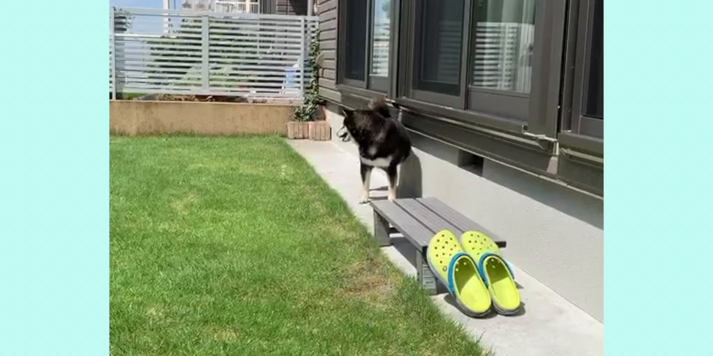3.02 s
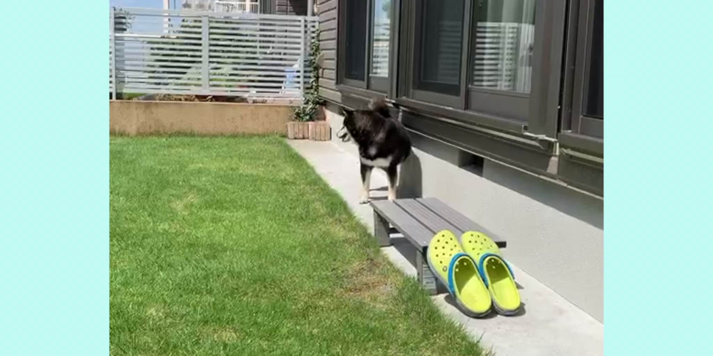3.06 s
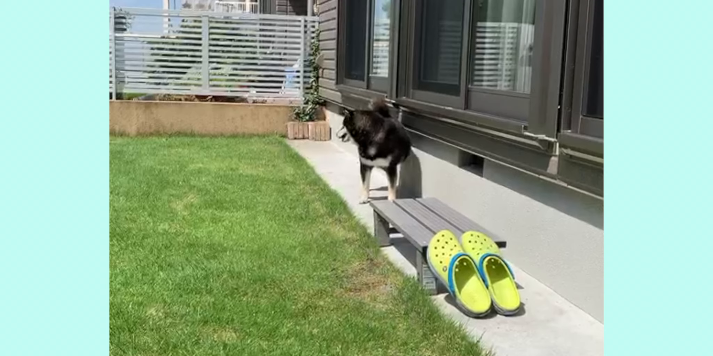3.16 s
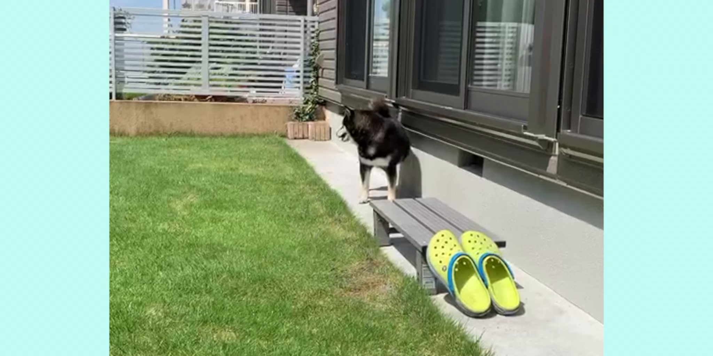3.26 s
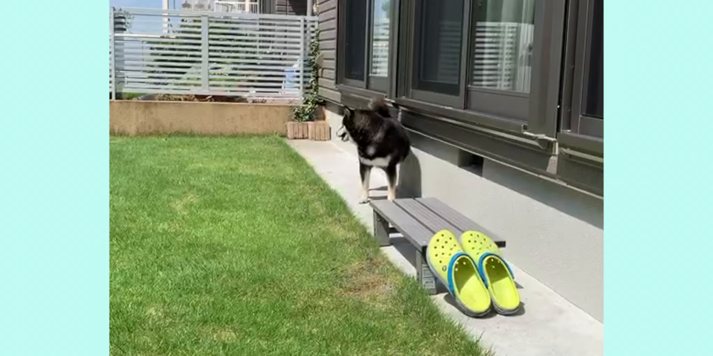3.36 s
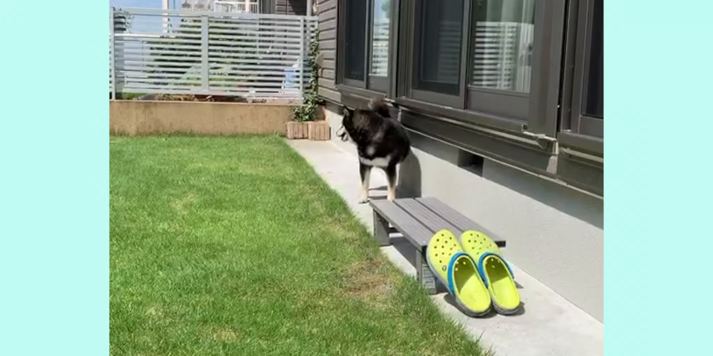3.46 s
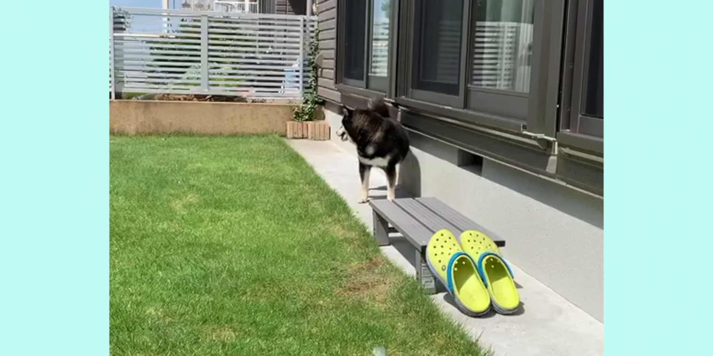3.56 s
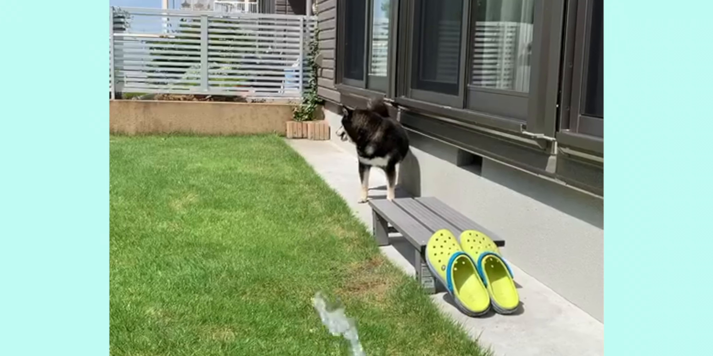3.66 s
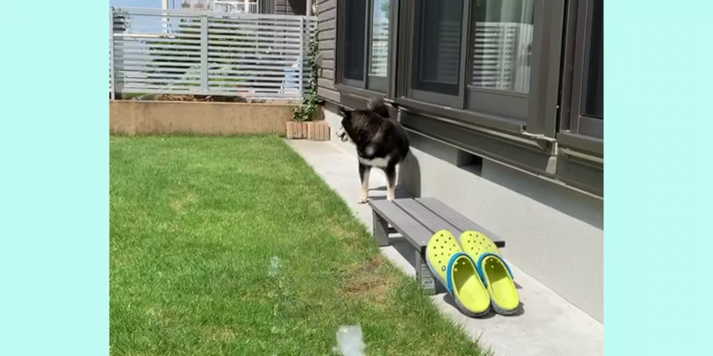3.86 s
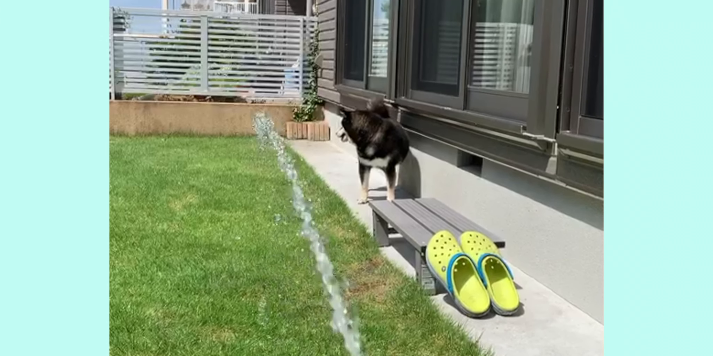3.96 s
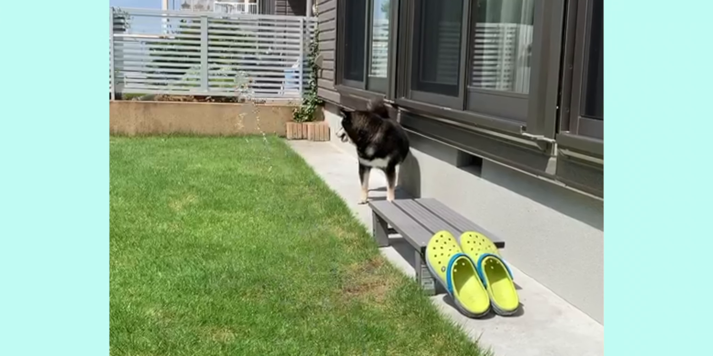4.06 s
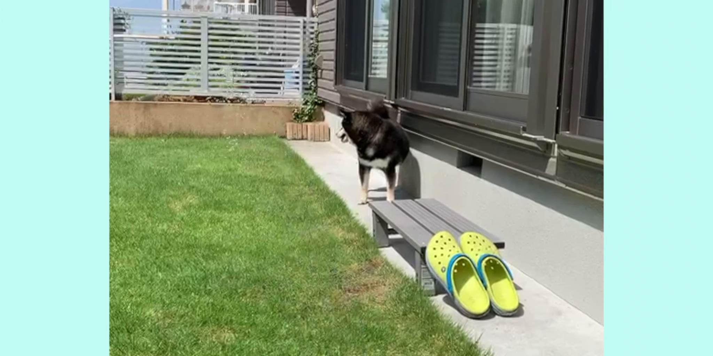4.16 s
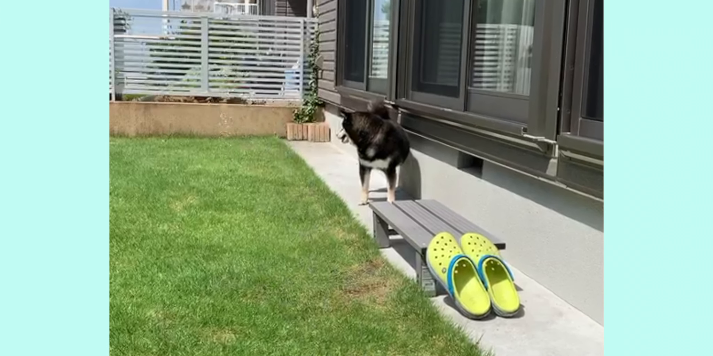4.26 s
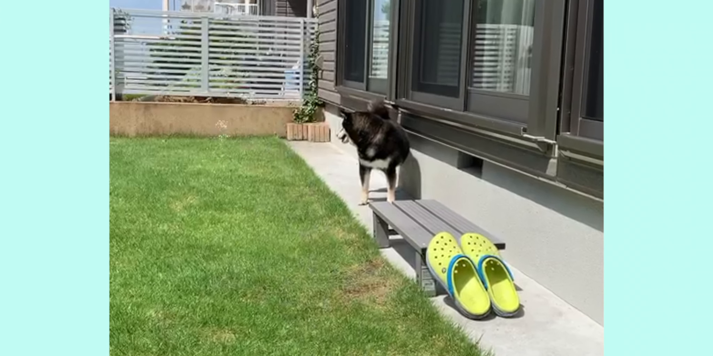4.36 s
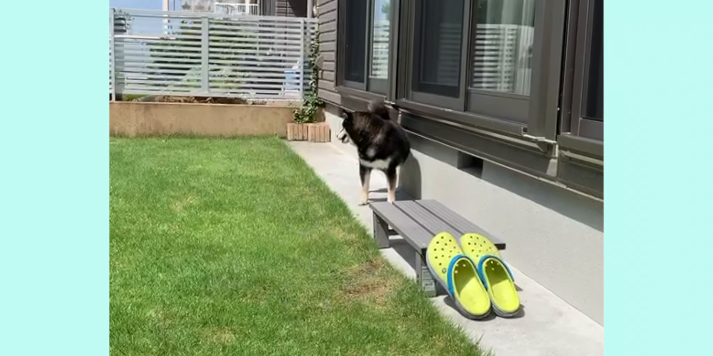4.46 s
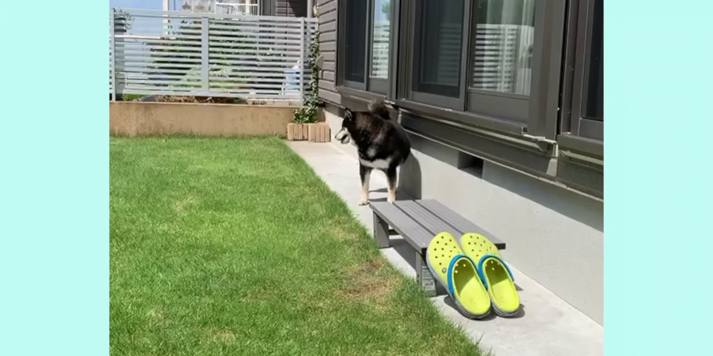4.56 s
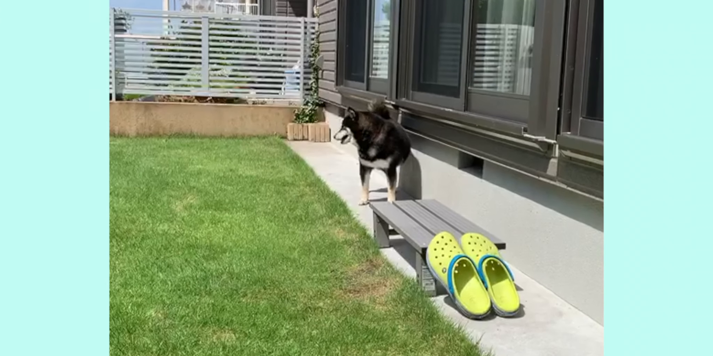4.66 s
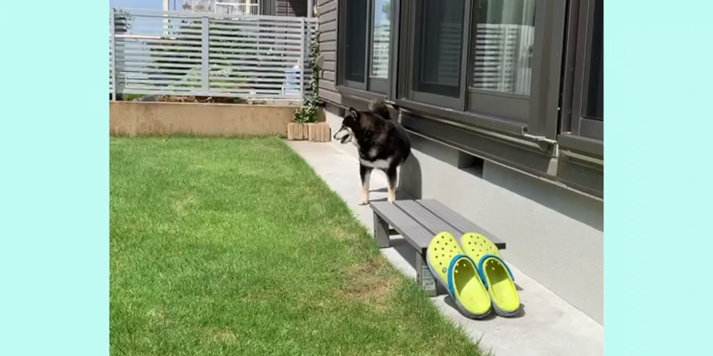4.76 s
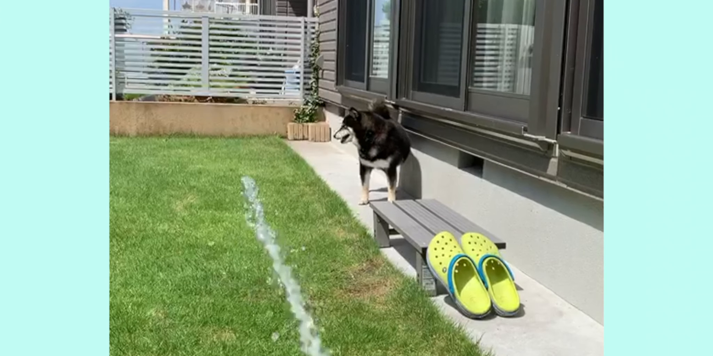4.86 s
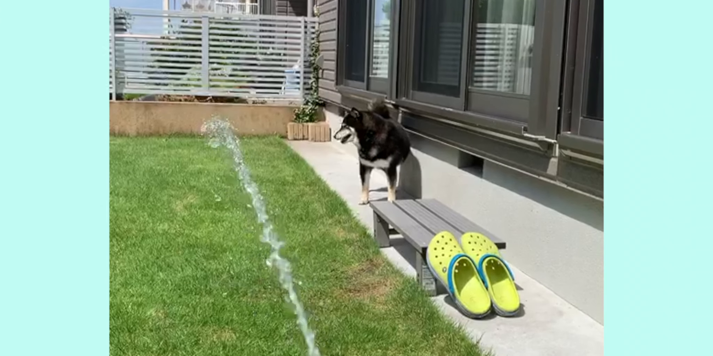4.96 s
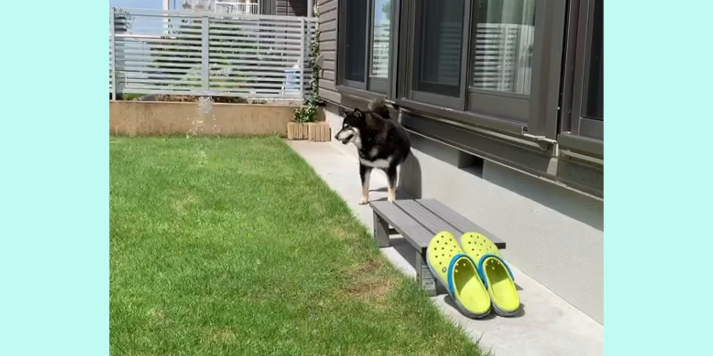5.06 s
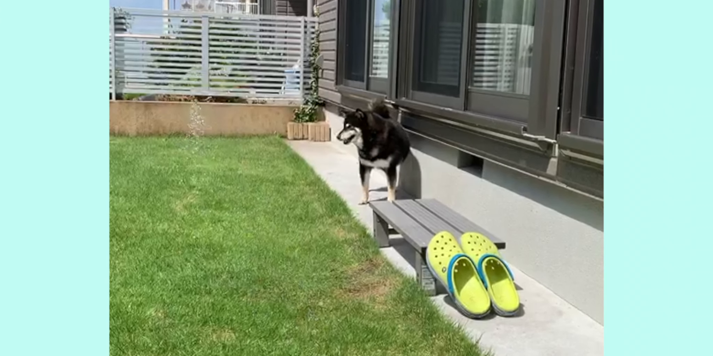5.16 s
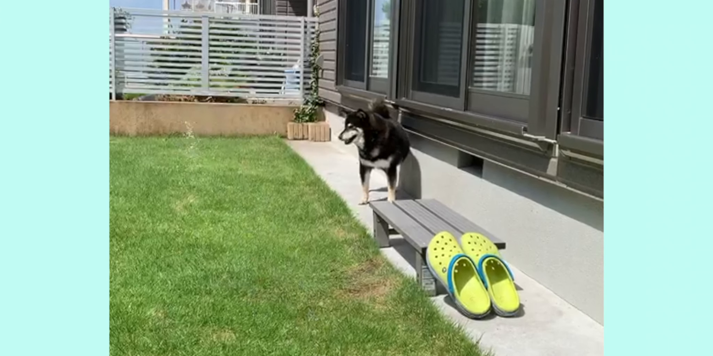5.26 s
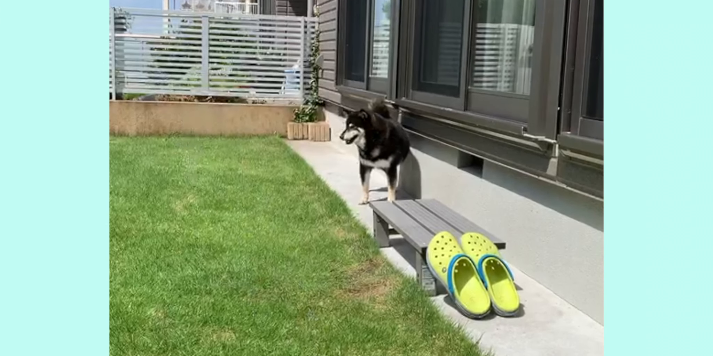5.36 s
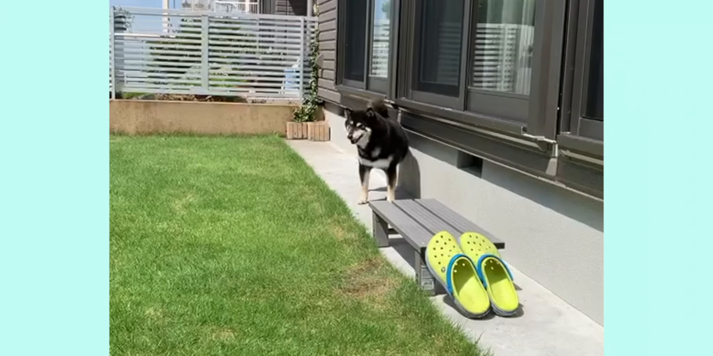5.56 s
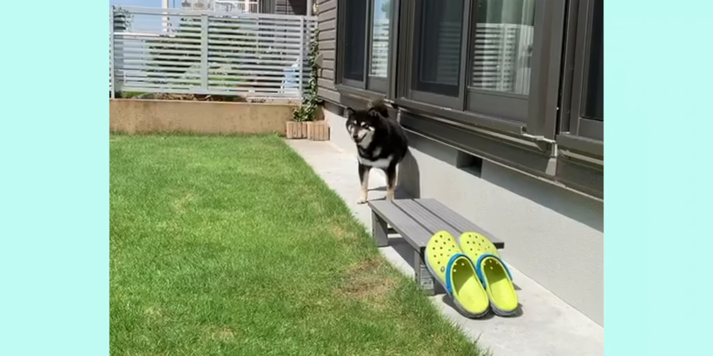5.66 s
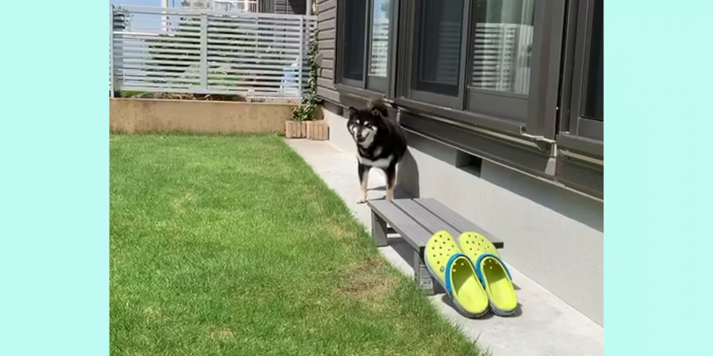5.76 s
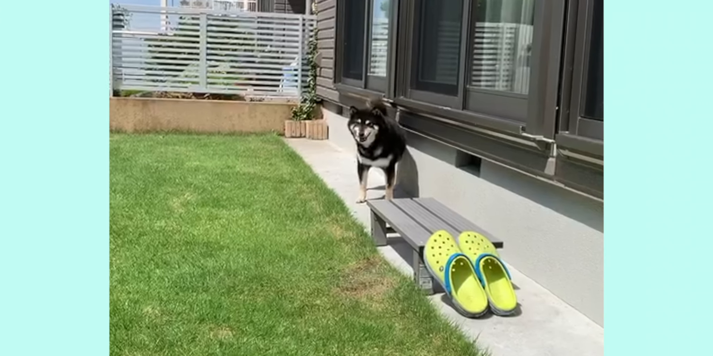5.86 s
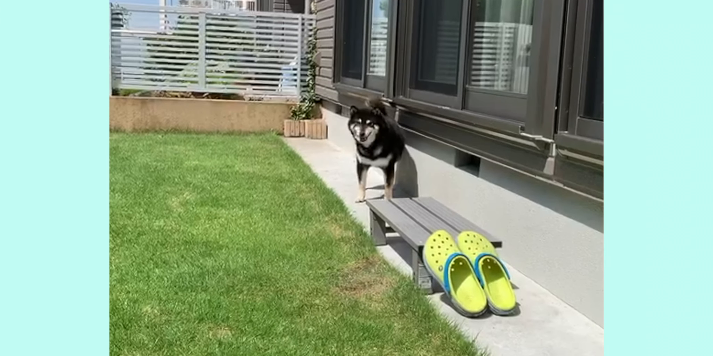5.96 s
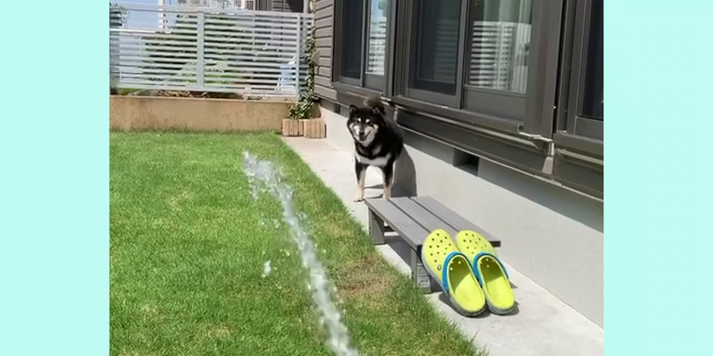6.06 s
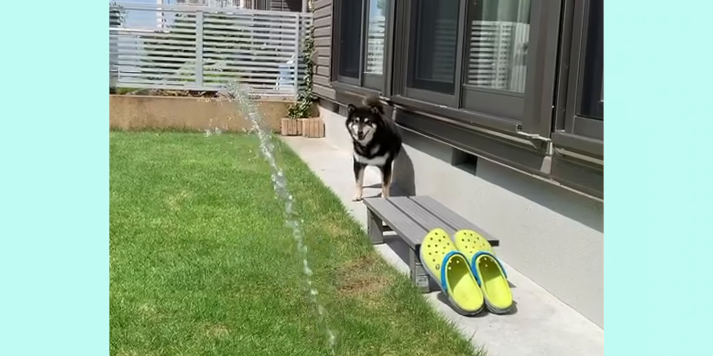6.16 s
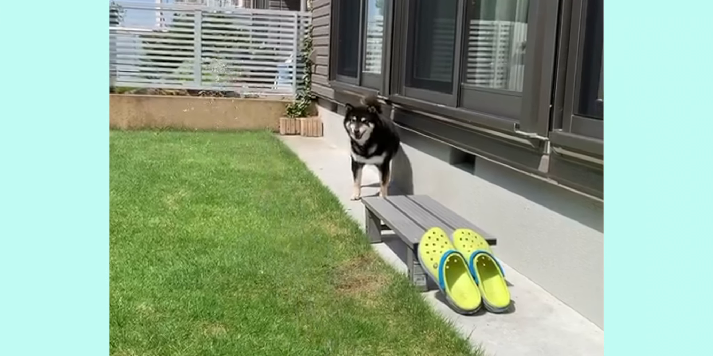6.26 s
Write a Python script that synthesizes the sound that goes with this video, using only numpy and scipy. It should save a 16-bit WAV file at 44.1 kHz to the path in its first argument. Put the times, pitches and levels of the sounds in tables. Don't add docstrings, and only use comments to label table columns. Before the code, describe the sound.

A hand squeezes a spray nozzle in brief bursts: clicks, spitting air, hiss, hard clack, then light water patter on grass amid buzzing cicadas.

```python
import sys
import numpy as np
from scipy import signal
from scipy.fft import rfft, irfft, next_fast_len
from scipy.io import wavfile
from scipy.ndimage import uniform_filter1d

SR = 44100
rng = np.random.default_rng(int(sys.argv[2]) if len(sys.argv) > 2 else 0)


def ratio(d):
    e = np.asarray(d, float) / 20
    return 10 ** e


def to_wav(sig):
    pcm = np.clip(np.atleast_2d(sig), -1, 1) * 32767
    pcm = np.round(pcm).astype(np.int16)
    wavfile.write(sys.argv[1], SR, pcm.T)


N = 278271


def evened(x):
    return x / np.sqrt(np.mean(x ** 2) + 1e-20)


def read(points, hz):
    f, value = np.transpose(points)
    return np.interp(np.log(hz + 1), np.log(f + 1), value)


def add(mix, s, sound):
    part = mix[..., round(s * SR):][..., :sound.shape[-1]]
    part += sound[..., :part.shape[-1]]


def coloured(x, spectrum, lo_hz, hi_hz):
    size = next_fast_len(N)
    hz = np.fft.rfftfreq(size, 1 / SR)
    z = rfft(x, size) * ratio(read(spectrum, hz))
    in_band = (hz > lo_hz) & (hz < hi_hz)
    band_rms = np.sqrt(2 * np.mean((abs(z[:, in_band]) ** 2).sum(1)) / size / N)
    return irfft(z, size)[:, :N] / band_rms


def resonate(x, hz, width_hz):
    turn = np.exp(2j * np.pi * np.cumsum(hz * np.ones(x.shape[-1])) / SR)
    r = np.exp(-np.pi * width_hz / SR)
    return 2 * (turn * signal.lfilter([1 - r], [1, -r], x / turn)).real


def slow(count, per_s):
    knots = rng.standard_normal((count, int(N / SR * 400) + 4))
    position = np.arange(N) / SR * per_s
    return np.array([np.interp(position, np.arange(len(k)), k) for k in knots])


def droplets(spread_db, per_s):
    size = ratio(spread_db * np.minimum(rng.exponential(1, (2, N)), 4))
    size = size * (rng.random((2, N)) < per_s / SR)
    drops = signal.oaconvolve(size, np.hanning(30)[None], "same", axes=1)
    return rng.standard_normal((2, N)) * np.sqrt(1 + (0.32 * evened(drops)) ** 2)


def patchy(patchy_db, size):
    frames = N // (size // 4) + 5
    a, b, c, d, patches = rng.standard_normal((frames, size // 2 + 1, 5)).T
    patches = evened(uniform_filter1d(uniform_filter1d(patches, 7, 0), 12, 1))
    z = np.array([a + 1j * b, c + 1j * d]) * ratio(patchy_db * patches)
    return signal.istft(z, nperseg=size, noverlap=size * 3 // 4)[1][:, :N]


def smooth(power):
    return np.interp(np.arange(N) / SR, np.arange(len(power)) / 1000, power)


def held(before_s, t60_s, db):
    t, power = np.arange(0, N / SR, .001), 0
    for opens, shut, flow_db, *_ in SQUIRTS:
        rise_db = -26.0 * np.maximum(opens - t, 0) / before_s
        fall_db = -60 * np.maximum(t - shut, 0) / t60_s
        power = power + ratio(flow_db + db + rise_db + fall_db) ** 2
    return smooth(power)


def landed(rows):
    t = np.arange(0, N / SR, .001)
    return smooth(sum(ratio(db) ** 2 * np.exp(-((t - s) / spread) ** 2) for s, db, spread in rows))


# [Hz, dB]
RUMBLE = [(20, -11), (32, -12), (55, 4.5), (80, 1), (130, -4), (250, -9.5), (450, -17), (700, -16.5),
          (1200, -39), (1800, -51.5)]


def town():
    level_db = -56
    return ratio(level_db) * coloured(patchy(3.1, size=2048), RUMBLE[:7] + [(800, -69.5)], 18, 500)


# f/Hz, density/dB
WASH_COLOUR = [(250, -8), (500, 4), (1000, 5.5), (1800, -3.5), (2600, -9)]
# t/s, level/dB, spread/s
RUSTLES = [
    (.33, -57, 0.039),
    (.47, -60, 0.056),
    (.85, -66, 0.042),
    (1.9, -64, .08),
    (3.6, -70, 0.22),
    (4.3, -59.5, 0.021),
    (5.28, -61.5, 0.051),
]


def wash():
    floor_db, landing_db = -76.5, -17
    stirred = held(before_s=0.11, t60_s=0.55, db=-5.5)
    power = ratio(floor_db) ** 2 + stirred + ratio(landing_db) ** 2 * landed(LANDINGS) + landed(RUSTLES)
    return np.sqrt(power) * coloured(patchy(3.7, size=512), WASH_COLOUR, 340, 1800)


# t/s, level/dB
CHORUS = [(0.0, -47.5), (0.33, -49.5), (0.83, -48), (2.41, -48.5), (3.78, -49.5), (5.18, -50),
          (5.97, -50.5), (6.31, -49.5)]
# f/Hz, density/dB
CICADAS = [(1500, -25.1), (2000, -16.9), (2500, -6.4), (3200, 0.0), (3800, -1.2), (4600, -2.5),
           (5500, -2.3), (6600, -3.2), (7600, -6.4), (9000, -7.6), (10000, -12.6), (11000, -22.7),
           (13500, -30.1), (15500, -60.9)]
# f/Hz, rms level/dB
SINGERS = [(3332, -67.5), (3779, -66.5), (4640, -101), (5071, -96), (5572, -66.5), (6072, -71),
           (6406, -71.5), (6654, -69.5), (7020, -72.5)]


def cicadas():
    chorus = coloured(patchy(2.28, size=512), CICADAS, 5360, 7110)
    waver, swell = slow(count=len(SINGERS), per_s=5.6), slow(count=len(SINGERS), per_s=22)
    buzz = slow(count=1, per_s=110)
    noise, near = rng.standard_normal((2, N)), 0
    for (hz, db), w, up in zip(SINGERS, waver, swell):
        song = evened(resonate(noise, hz * (1 + 0.00815 * w), width_hz=15))
        near = near + ratio(db + 4.96 * up) * song
    level_db = np.interp(np.arange(N) / SR, *np.transpose(CHORUS))
    return ratio(level_db - 1.54 + 1.1 * buzz) * chorus + ratio(level_db - level_db.mean() + 7.5) * near


# f/Hz, density/dB
LAWN = [(300, -48), (1200, -45), (3500, -2), (7000, -1), (11000, -6), (16000, -4.5)]
# t/s, level/dB, spread/s
LANDINGS = [(.48, -60, .03), (.6, -52.5, 0.049), (1.82, -62, 0.084), (2.77, -63, 0.067),
            (2.91, -52.5, 0.029), (3.02, -58, 0.063), (3.98, -51, 0.017), (4.27, -66, 0.084),
            (4.44, -63.5, .03), (5.2, -59, 0.018), (5.38, -55.5, 0.032)]


def patter():
    drizzle_db = -76.5
    leak = held(before_s=0.04, t60_s=.01, db=-9)
    drip = held(before_s=.001, t60_s=0.067, db=8.5)
    power = ratio(drizzle_db) ** 2 + landed(LANDINGS) + leak + drip
    drops = coloured(droplets(spread_db=5.5, per_s=1500), LAWN, 10500, 18000)
    return ratio(-3.0 + 2.5 * slow(count=1, per_s=40)) * np.sqrt(power) * drops


# t/s, peak level/dB, f/Hz
TICKS = [(5.283, -40, 1470), (0.06, -32, 720), (0.125, -30, 1500), (0.293, -28, 1690), (1.283, -32.5, 860),
         (1.353, -27, 1640), (1.503, -31.5, 1660), (1.776, -32.5, 1590), (1.785, -40, 1770),
         (2.403, -25, 1650), (2.57, -32, 1530), (3.406, -44, 770), (3.542, -69, 1450), (3.632, -30, 720),
         (3.71, -25.5, 1640), (3.724, -36, 1660), (3.834, -30, 1200), (3.974, -33, 1150),
         (4.005, -38, 1080), (4.266, -32.5, 1690), (4.76, -25, 1710), (5.13, -40, 1130),
         (5.207, -37.5, 1020), (5.267, -35, 1730), (5.914, -59, 950), (5.936, -54, 1260),
         (5.983, -28, 1760), (6.108, -24.5, 1150), (6.125, -29, 1170), (6.234, -34, 1440)]


def ticks():
    out, t = np.zeros(N), np.arange(2000) / SR
    t60_s, rise_s = 0.02, 0.00082
    modes = [(1, 1.0), (0.97, 0.25), (0.86, 0.66), (0.75, 0.61)]
    for s, db, hz in TICKS:
        ring = sum(share * np.sin(2 * np.pi * k * hz * t) for k, share in modes)
        ring = ring * ratio(-60 * t / t60_s) * (1 - np.exp(-t / rise_s))
        add(out, s - .0006, ratio(db - 6.0) * ring / abs(ring).max())
    return out


# t/s, peak level/dB
SPRING = [(0.0343, -41), (0.058, -32), (0.1865, -41), (1.2855, -32), (1.3074, -40), (1.4212, -31),
          (2.5223, -17), (3.4415, -26), (3.4984, -25), (3.6214, -55), (3.6282, -30), (3.8487, -38),
          (4.6907, -41), (4.723, -25), (5.911, -29), (6.208, -33), (6.2317, -37.5)]


def spring():
    out, t = np.zeros(N), np.arange(-200, 400) / SR
    for s, db in SPRING:
        noise = rng.standard_normal(600)
        click = np.diff(noise, 2, prepend=[0, 0]) * np.exp(-abs(t - .0008) / 0.00078)
        add(out, s + t[0], ratio(db) * click / abs(click).max())
    return out


# t/s, peak level/dB, crack level/dB, touch lead/s, grip pitch ratio
KNOCKS = [
    (0.1999, -18, -16, 0.00114, 0.795),
    (1.4514, -12.5, -10, 0.0019, 1),
    (2.5291, -13, -8, 0.00228, 1.003),
    (3.9228, -14, -12, 0.0017, 1.05),
    (4.9051, -14, -12.5, 0.00226, 0.996),
    (6.0884, -9, -5, .0038, 1.02),
]
# f/Hz, level/dB, t60/s
BODY = [(430, -11.5, 0.031), (785, -0.5, 0.03), (943, -2, 0.026), (999.5, 6, 0.019), (1134, -7.5, 0.026),
        (1425, -1, .018), (1973, -7, 0.018), (2680, -8, 0.03), (3370, -4, 0.03)]


def knocks():
    out, t = np.zeros(N), np.arange(3000) / SR
    touch_db, blow_s = -12, 0.00063
    bright_db_per_oct, bright_per_crack = 1.5, 0.27
    hz, mode_db, t60_s = np.transpose(BODY)[..., None]
    t60_s = np.minimum(t60_s, 22 / hz)
    for s, db, crack_db, lead_s, pitch in KNOCKS:
        noise = rng.standard_normal(3000)
        grip = pitch + .02 * noise[:len(BODY), None]
        tilt_db = bright_db_per_oct + bright_per_crack * (crack_db - db)
        level = ratio(mode_db + tilt_db * np.log2(hz / 900) - 60 * t / t60_s)
        sign = np.sign(hz - 600)
        ring = (level * np.sin(2 * np.pi * hz * grip * t) * sign).sum(0)
        ring = ring * (1 - np.exp(-t / blow_s)) ** 2
        both = ratio(touch_db) * ring
        add(both, max(lead_s, 0), ring)
        add(out, s - lead_s, ratio(db) * both / abs(both).max())
        crack = signal.lfilter([1, -.3], [1], noise) * t * np.exp(-t / .0013)
        add(out, s - .0003, ratio(crack_db) * crack / abs(crack).max())
    return out


# t/s, peak level/dB, f/Hz
SPITS = [(0.0786, -19, 5940), (0.1282, -25, 4330), (0.1723, -34, 3960), (0.1903, -36, 8600),
         (1.316, -20.5, 5430), (1.3449, -34, 4820), (1.3511, -29, 4820), (1.31, -28, 3400),
         (1.4326, -35, 4900), (2.3648, -25, 5560), (2.3724, -24, 5700), (2.374, -19, 5800),
         (2.513, -42, 4240), (3.434, -34, 6130), (3.5462, -30, 4170), (3.5947, -33, 3450),
         (3.7835, -26, 8060), (3.7929, -18, 5300), (3.8097, -27.5, 5340), (3.8132, -26, 5000),
         (3.862, -34, 5600), (3.8682, -30, 5360), (3.911, -30, 10850), (4.7302, -19, 6160),
         (4.7874, -27.5, 5300), (4.8037, -48, 5450), (5.9355, -22, 5760), (5.9398, -20.5, 4650),
         (5.9874, -35, 4870), (6.2395, -17, 6000)]


def spits():
    out, t = np.zeros(N), np.arange(-200, 400) / SR
    treble_db, rise_s, shortest_s, longest_ratio = -8.5, 0.00035, 0.0014, 2.4
    for s, db, hz in SPITS:
        noise = rng.standard_normal(600)
        length_s = shortest_s * longest_ratio ** min(abs(noise[0]), 1)
        puff = evened(resonate(noise, hz, width_hz=1470))
        puff = puff + ratio(treble_db) * np.diff(noise, prepend=0)
        puff = abs(signal.hilbert(puff)) ** -.3 * puff
        puff = puff * np.exp(-np.maximum(t / length_s, -t / rise_s))
        add(out, s + t[0], ratio(db + 3) * puff / abs(puff).max())
    return out


# open t/s, shut t/s, flow level/dB, whistle level over flow/dB, throat f/Hz
SQUIRTS = [
    (0.042, 0.198, -54, -8, 5400),
    (1.295, 1.451, -52, 8.5, 4950),
    (2.356, 2.525, -53.5, 10.5, 5100),
    (3.44, 3.639, -69, 19.5, 3900),
    (3.781, 3.926, -53, 10.5, 5730),
    (4.716, 4.913, -52, 4.5, 5500),
    (5.926, 6.093, -50.5, 11.5, 5500),
    (6.226, 6.344, -52, 5, 5750),
]
# f/Hz, density/dB
JET = [(150, -6), (400, 0), (800, 2), (1500, -1), (2200, -3), (3200, -2), (6500, 2), (8000, -2), (10000, 1),
       (12500, 1), (15300, 0), (17000, -3)]


def squirts():
    open_s, close_s = 0.024, 0.0019
    gush_db, gush_s = 31, 0.0072
    surge_db, surge_s = 8, .013
    sag_per_s, throat_width_hz, flutter_db = 1, 1700, 3.2
    hiss = coloured(droplets(spread_db=2.5, per_s=1200), JET, 10300, 12200)
    flutter, sputter, out = slow(count=3, per_s=280), slow(count=2, per_s=35), np.zeros((2, N))
    for opens, shut, flow_db, whistle_db, hz in SQUIRTS:
        at = np.arange(round(opens * SR), min(round(shut * SR), N))
        since, until = at / SR - opens, shut - at / SR
        throat_hz = hz * (1 - sag_per_s * since) * (1 + 0.013 * flutter[0, at])
        whistle = resonate(hiss[:, at], throat_hz, throat_width_hz)
        whistle = evened(resonate(whistle, throat_hz, throat_width_hz))
        surge = surge_db * np.exp(-until / surge_s)
        whistle *= ratio(whistle_db + flutter_db * flutter[1, at] + 3.6 * sputter[0, at] - 2 * surge)
        gush = gush_db * np.exp(-since / gush_s)
        flow = ratio(flow_db + gush + surge + 0.5 * sputter[1, at])
        flow *= np.minimum(since / open_s, 1) * np.minimum(until / close_s, 1)
        out[:, at] += flow * (ratio(3.7 * flutter[2, at]) * hiss[:, at] + whistle)
    return out


def echoed(x, wet_db=-17, t60_s=0.059, yard_db=-25, yard_t60_s=0.32):
    t = np.arange(12000) / SR
    decay = ratio(-60 * t / np.array([[t60_s], [yard_t60_s], [.004]]))
    wall, yard, twin = rng.standard_normal((3, 12000)) * decay
    wall, yard = uniform_filter1d(wall, size=3), uniform_filter1d(yard, size=4)
    tail = ratio(wet_db) * wall / np.linalg.norm(wall) + ratio(yard_db) * yard / np.linalg.norm(yard)
    direct = np.array([x, signal.oaconvolve(x, twin / np.linalg.norm(twin))[:N]])
    return direct + signal.oaconvolve(direct, (tail * (t > .002))[None], axes=1)[:, :N]


# f/Hz, lead/rad
LEAD = [(60, 0), (125, -.2), (500, -.8), (1300, -1.2), (2000, 0), (2700, -.5), (3250, 1.8), (4000, 2.3)]


def ports(pair, same):
    opposed_hz, full_turn_hz = 4700, 4300
    size = next_fast_len(N)
    hz = np.fft.rfftfreq(size, 1 / SR)
    lead = read(LEAD + [(opposed_hz, np.pi)], hz)
    lead = lead + 2 * np.pi * np.maximum(hz - opposed_hz, 0) / full_turn_hz
    c, (a, b) = np.clip(read(same, hz), 0, 1), rfft(pair, size)
    left = ratio(-0.03) * a * np.exp(.5j * lead)
    right = (c * a + np.sqrt(1 - c ** 2) * b) * np.exp(-.5j * lead)
    return irfft(np.array([left, right]), size)[:, :N]


# f/Hz, share
NEAR_SAME = [(100, 1), (1900, 0.94), (2400, 0.48), (3000, 0.04), (3500, 0.53), (4300, 0.9), (16000, 0.98)]
# f/Hz, share
FAR_SAME = [(30, 0.93), (200, 1), (600, 0.1), (1300, 0.4), (1900, 0.65)]


def scene():
    near = squirts() + echoed(spits() + spring() + knocks() + ticks()) + patter() + cicadas()
    return ports(near, NEAR_SAME) + ports(town() + wash(), FAR_SAME)


def low_pass(x):
    return signal.sosfilt(signal.butter(12, 16440, fs=SR, output="sos"), x)


def record(dry):
    ceiling = .5
    mix = ceiling * np.tanh(dry / ceiling)
    return low_pass(mix)


dry = scene()
out = record(dry)
to_wav(out)
```